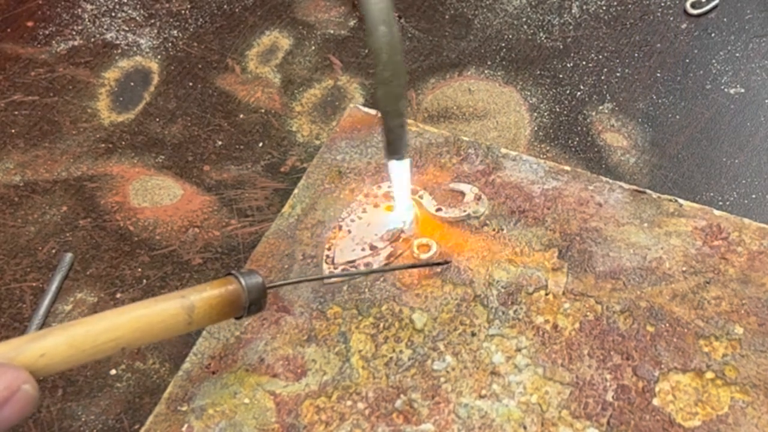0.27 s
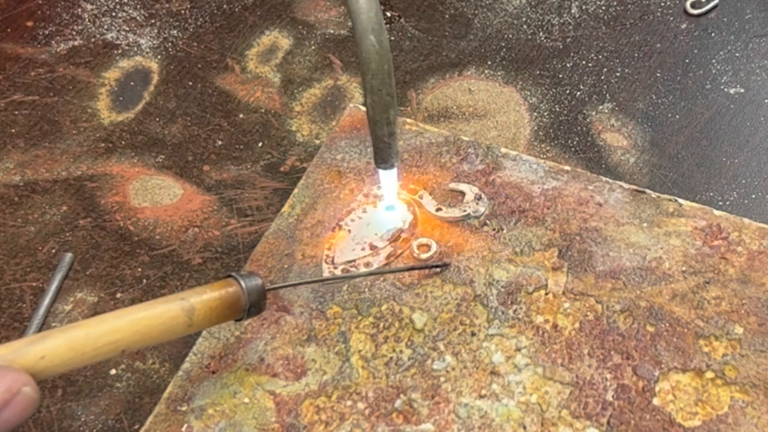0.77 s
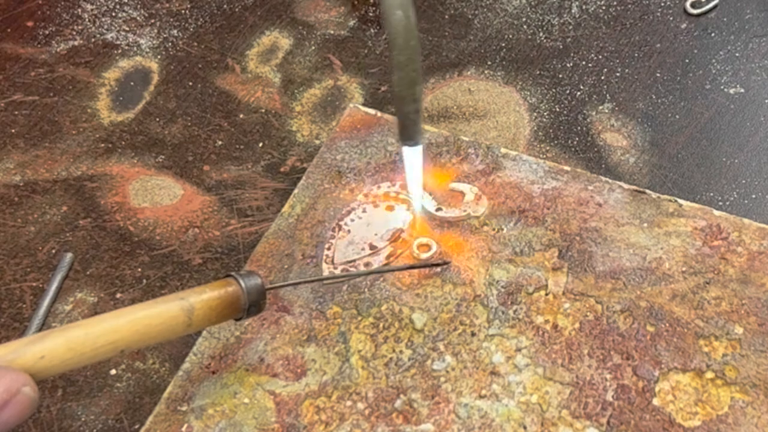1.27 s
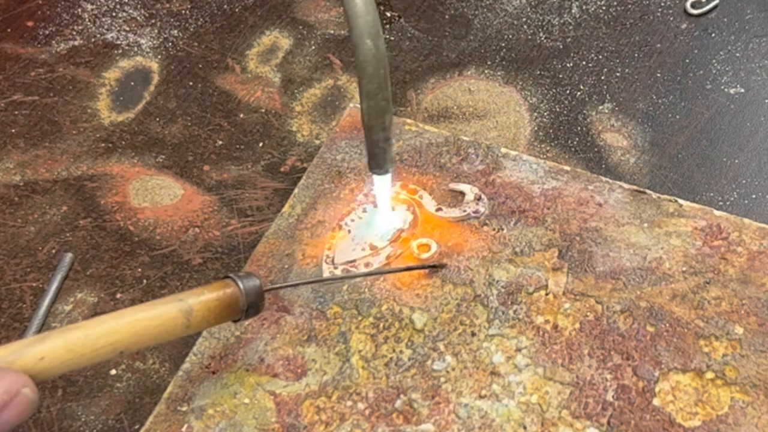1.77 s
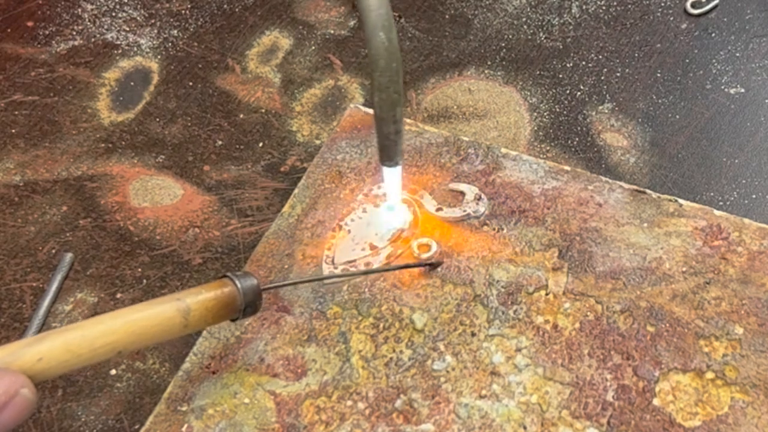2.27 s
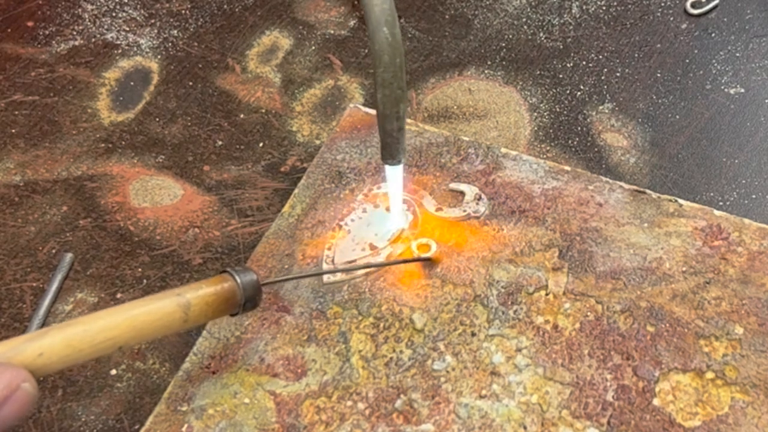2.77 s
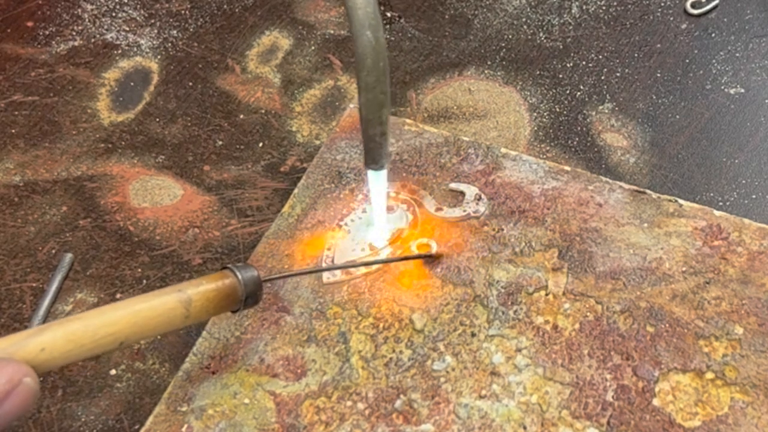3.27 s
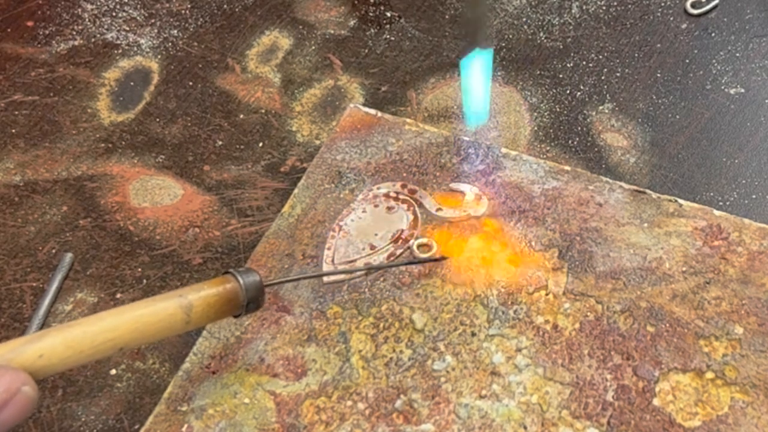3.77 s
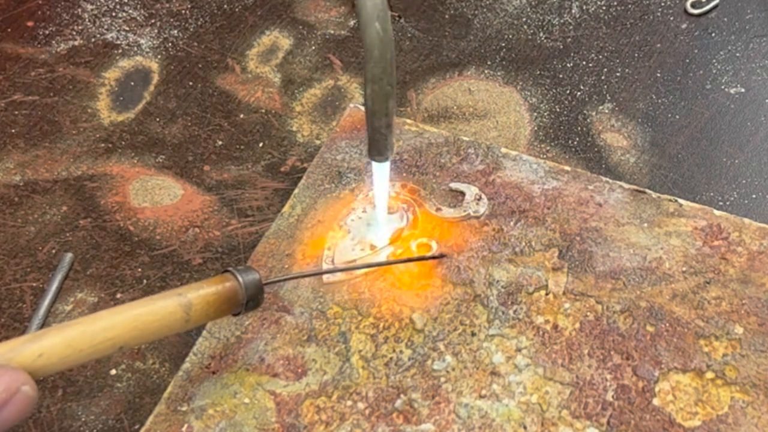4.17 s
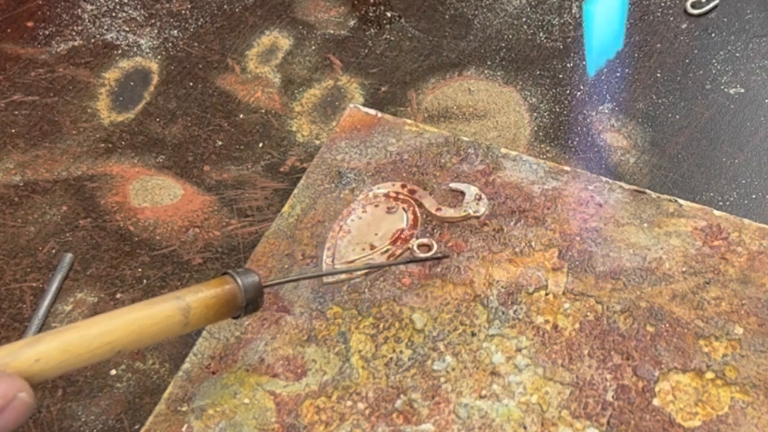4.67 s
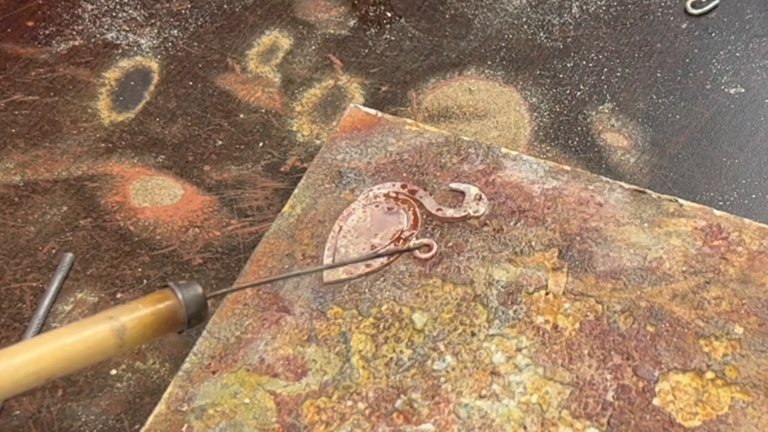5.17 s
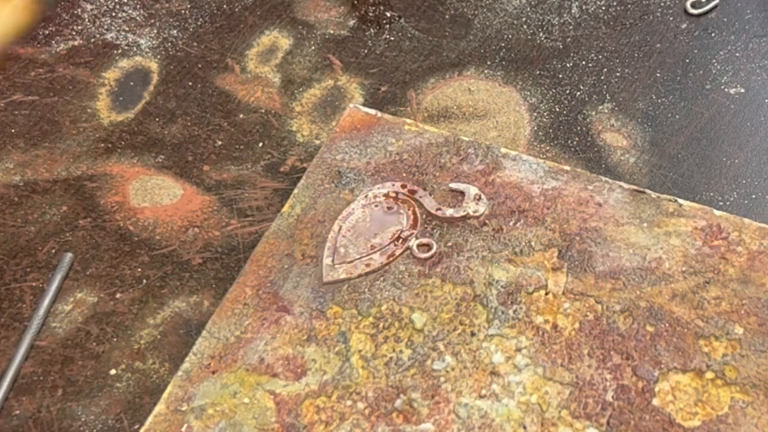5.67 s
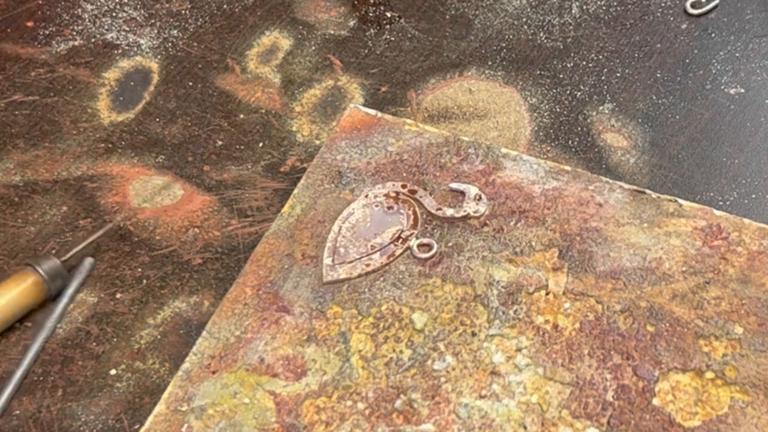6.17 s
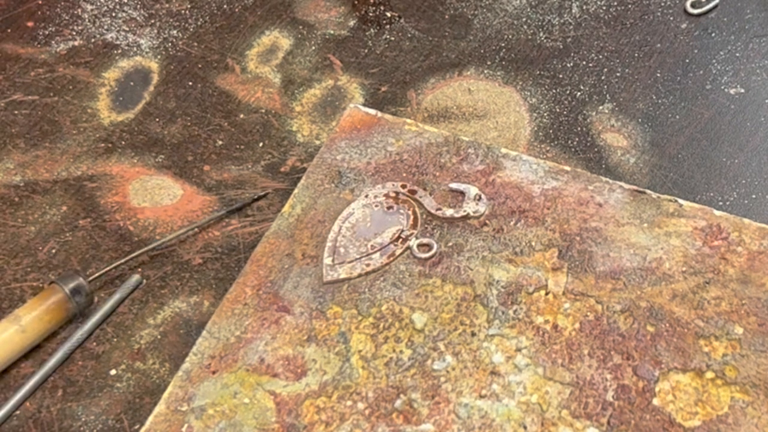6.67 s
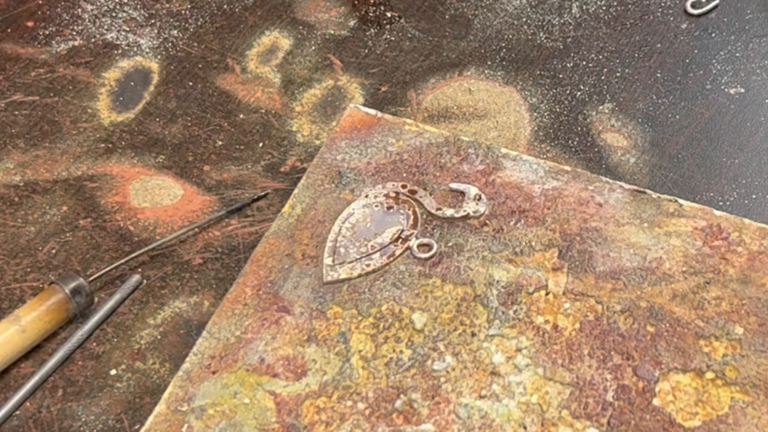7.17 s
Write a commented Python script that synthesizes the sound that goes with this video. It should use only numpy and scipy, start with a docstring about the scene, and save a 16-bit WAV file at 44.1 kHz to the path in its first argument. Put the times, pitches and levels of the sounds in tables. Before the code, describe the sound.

A small gas torch roars, flutters and spits over a hard block, grows quieter, then dies with a sharp gas pop, leaving a faint fan hum.

```python
"""On a workbench in a room with a humming fan, a small gas torch burns over a soldering block.
Turbulent combustion gives a fluttering roar and spitting; the jet hisses through the pipe modes of the neck.
Single spits ring as damped resonances, and the block, bench and room add delayed reflections.
The torch is swung aside, one valve closes with a puff, the flame dies and a last puff of gas escapes."""
import sys
import numpy as np
from scipy import signal
from scipy.fft import rfft, irfft, next_fast_len
from scipy.io import wavfile

SR = 44100
rng = np.random.default_rng(int(sys.argv[2]) if len(sys.argv) > 2 else 0)


def unload_wav(signal):
    """Save mono or channel-first audio to the path in sys.argv[1] as 16-bit WAV at rate SR, clipped to [-1, 1]."""
    wavfile.write(
        sys.argv[1],
        SR,
        np.round(np.clip(np.atleast_2d(signal).T, -1, 1) * 32767).astype(np.int16),
    )


N = 326781
STEP = 16   # samples per step of the slow controls


def from_db(db):
    """Level to amplitude ratio: 20 dB is a factor of ten."""
    return 10 ** (np.asarray(db) / 20)


def rms_one(x):
    """Normalisation of a signal to unit rms."""
    return x / np.sqrt(np.mean(x ** 2) + 1e-20)


def in_time(rows):
    """Linear interpolation of each table column over time, silent outside its span."""
    t, *columns = np.transpose(rows)
    now = np.arange(N) / SR
    return [np.interp(now, t, column, left=-120, right=-120) for column in columns]


def step_to_samples(control):
    """Linear interpolation of a slow control, one value a step, to the sample rate."""
    return np.interp(np.arange(N) / STEP, np.arange(len(control)), control)


def at_hz(points, hz):
    """Spectrum interpolated over log frequency, falling 30 dB per octave beyond its ends."""
    f, level = np.transpose(points)
    octaves_outside = np.abs(np.log2((hz + 1) / np.clip(hz + 1, f[0], f[-1])))
    return np.interp(np.log(hz + 1), np.log(f), level) - 30 * octaves_outside


def coloured(spectrum):
    """Spectral shaping: white noise weighted in the frequency domain, then set to unit rms."""
    size = next_fast_len(N)
    hz = np.arange(size // 2 + 1) * SR / size
    white = rfft(rng.standard_normal(size))
    return rms_one(irfft(white * from_db(at_hz(spectrum, hz)), size)[:N])


def drift(rate_hz):
    """Low-pass random process of unit rms, one value a step."""
    r = np.exp(-2 * np.pi * rate_hz * STEP / SR)
    chance = rng.standard_normal(N // STEP + 3002)
    return rms_one(signal.lfilter([1], [1, -2 * r, r * r], chance)[3000:])   # settled part only


def resonance(x, hz, width_hz):
    """Damped second-order resonator with unit gain at its peak."""
    r = np.exp(-np.pi * width_hz / SR)
    poles = [1, -2 * r * np.cos(2 * np.pi * hz / SR), r * r]
    return signal.lfilter([(1 - r * r) / 2, 0, (r * r - 1) / 2], poles, x)


# Air noise of the fan: f/Hz, relative level/dB
FAN_SPECTRUM = [(13, -72), (22, -41.5), (59, -47), (84, -10), (102, -10), (121, -53), (163, -7.5),
                (215, -8.5), (246, -4), (315, -16), (1020, -18.5), (1460, -29.5), (15500, -61.5)]
# Wavering hums of the fan: f/Hz, width/Hz, level/dB
FAN_HUMS = [(91.6, 26, -61.5), (175.3, 12, -52), (242.5, 8.6, -54)]


def fan():
    """Broadband flow noise plus narrow-band noise, whose small bandwidth is heard as wavering hums."""
    hums = [from_db(db) * rms_one(resonance(rng.standard_normal(N), hz, width_hz))
            for hz, width_hz, db in FAN_HUMS]
    return from_db(-46.5) * coloured(FAN_SPECTRUM) + sum(hums)


def room(x):
    """Reverberation: convolution with a dull, exponentially decaying noise tail."""
    t60_s, level_db = 0.23, -15.5
    t = np.arange(round(.4 * SR)) / SR
    dull = signal.lfilter([1], [1, -1.4, .49], rng.standard_normal(len(t)))
    tail = dull * from_db(-60 * t / t60_s) * (t > .006)   # begins 6 ms after the direct sound
    return from_db(level_db) * signal.fftconvolve(x, tail / np.sqrt(np.sum(tail ** 2)))[:N]


# Deep steady part of the burning: f/Hz, relative level/dB
DRONE_SPECTRUM = [(70, -22.5), (160, 3.5), (260, 0.5), (340, -9.5)]


def drone():
    """Diffuse field: the deep part fills the room evenly until the flame goes out, then fades in 30 ms."""
    flame_out_s = FLAME_LEVEL[-1][0]
    lit = np.clip((flame_out_s - np.arange(N) / SR) / .03 + 1, 0, 1)
    return from_db(-46.5) * lit * coloured(DRONE_SPECTRUM)


# Pitches cancelled by the bench reflection: start t/s, end t/s, start f/Hz, end f/Hz, width/Hz
HOLLOWS = [(0, 4.2, 940, 920, 70), (0, 2.7, 2290, 2290, 130), (0, 5.3, 3600, 3680, 160),
           (4.4, 5.3, 656, 615, 90), (4.6, 5.45, 2860, 2390, 129), (5.75, 6.8, 2040, 1800, 150)]


def hollowed(x, depth):
    """Destructive interference as gliding notches: shift to zero, low-pass, shift back, subtract."""
    out = x.copy()
    for start, end, from_hz, to_hz, width_hz in HOLLOWS:
        a, b = round(start * SR), round(end * SR)
        turn = np.exp(2j * np.pi * np.cumsum(np.linspace(from_hz, to_hz, b - a)) / SR)
        r = np.exp(-np.pi * width_hz / SR)
        at_zero = signal.lfilter([1 - r], [1, -r], out[a:b] / turn)
        band = 2 * np.real(at_zero * turn)
        out[a:b] -= depth * band * signal.windows.tukey(b - a, .1)
    return out


def echoes(x, taps):
    """Superposition of the direct sound and delayed shares, each delay a phase turn in the spectrum."""
    size = next_fast_len(N + 1000)
    turn_per_ms = -2j * np.pi * np.arange(size // 2 + 1) * SR / size / 1000
    reflections = sum(share * np.exp(turn_per_ms * ms) for ms, share in taps)
    return irfft(rfft(x, size) * (1 + reflections), size)[:N]


# Places of the torch: arrival t/s, then its near echoes as (delay/ms, share; negative = inverted)
PLACES = [(0, [(0.435, 0.11), (0.947, 0.098), (1.096, -0.075), (1.26, 0.027), (1.492, 0.19)]),
          (.55, [(0.391, -0.12), (1.161, -0.063), (1.346, -0.031), (1.547, 0.13), (1.63, -0.1),
          (2.467, 0.11), (3.468, -0.12)]), (4.25, [(0.618, 0.091), (1.776, -0.14)]), (4.72, [(0.583, 0.37),
          (1.131, -0.18), (1.791, -0.3), (1.919, -0.11), (2.096, -0.15), (3.255, -0.26)]),
          (5.5, [(0.671, 0.14), (0.778, 0.23), (1.311, -0.088), (1.97, 0.019)])]


def bench(x):
    """Early reflections from block, bench and hands; their comb pattern changes as the torch moves."""
    t, out, left = np.arange(N) / SR, np.zeros(N), np.ones(N)
    for arrival, taps in PLACES[::-1]:
        arrived = np.clip((t - arrival) / 0.18 + 1, 0, 1) * left   # crossfade over the last 0.18 s
        out += arrived * echoes(x, taps)
        left = left - arrived
    return out


# Low burning noise, before a small trim: t/s, level/dB
RUMBLE_LEVEL = [(0.0, -39), (.7, -39), (3.98, -41), (5.3, -46.5), (5.68, -41.5), (6.78, -46.5), (6.82, -61)]
# Its colour: f/Hz, relative level/dB
RUMBLE_SPECTRUM = [(280, -4), (400, -2), (600, 1), (850, 0), (1200, 0.5)]


def rumble():
    """Low combustion noise: steady coloured noise slowly sinks, rises a little, then dies with the flame."""
    level_db, = in_time(RUMBLE_LEVEL)
    return from_db(level_db - 0.26) * coloured(RUMBLE_SPECTRUM)


# Narrow bands that stand out: start t/s, end t/s, start f/Hz, end f/Hz, width/Hz, level/dB before fades
WHISTLES = [(0.502, 0.72, 650, 710, 330, -36.5), (.04, 0.34, 4650, 4500, 340, -41.5),
            (3.135, 3.351, 2870, 2950, 230, -44.5), (4.56, 5.7, 3214, 2850, 300, -46.5),
            (4.86, 5.302, 5300, 4900, 300, -59), (5.05, 5.4, 6900, 6100, 230, -53),
            (5.1, 6.07, 1150, 1000, 190, -42), (6.002, 6.789, 1030, 950, 200, -44.5),
            (5.9, 6.79, 1500, 1450, 240, -41), (5.75, 6.795, 2520, 2300, 210, -47.5),
            (5.75, 6.3, 3050, 3150, 220, -50.5), (5.9, 6.35, 5100, 5100, 220, -57),
            (6.2, 6.79, 3850, 3750, 230, -58), (4.25, 4.9, 5300, 5000, 300, -54.5)]


def whistles():
    """Narrow-band noise by quadrature modulation of a gliding carrier, swelling in and out."""
    out = np.zeros(N)
    for start, end, from_hz, to_hz, width_hz, db in WHISTLES:
        a, b = round(start * SR), round(end * SR)
        r = np.exp(-np.pi * width_hz / SR)
        slow = signal.lfilter([1], [1, -2 * r, r * r], rng.standard_normal((2, b - a)))
        phase = 2 * np.pi * np.cumsum(np.linspace(from_hz, to_hz, b - a)) / SR
        band = rms_one(slow[0] * np.cos(phase) + slow[1] * np.sin(phase))
        out[a:b] += from_db(db) * band * signal.windows.tukey(b - a, .4)
    beads = from_db(3.0 * drift(60))   # one common flutter chops them into beads
    return out * step_to_samples(beads)


# Puffs of gas at the valves: start t/s, level/dB, rise time constant/s, shut t/s, fall/(dB per s)
PUFFS = [(5.614, -22, 0.016, 5.672, 700), (6.853, -21, 0.0082, 6.915, 700)]
# Colour of each puff: f/Hz, relative level/dB
PUFF_SPECTRA = [
    [(180, -62), (300, -27), (592, -21), (653, -22), (1000, -4), (1250, -7), (1330, -7.5), (3540, -14),
     (5720, -14.5), (15700, -29.5)],
    [(59, -51), (100, -9), (156, -3.5), (543, -23.5), (591, -11.5), (1440, -4), (1560, -5.5), (2600, -10),
     (6320, -28), (7330, -22.5), (15700, -48)],
]
# Modes of the valve click: f/Hz, level/dB, T60/s
CLICK_MODES = [(1570, -10.5, 0.018), (4570, -23, .01)]


def valves():
    """Escaping-gas noise swells until the gap shuts, then decays; damped modes click at the second puff."""
    now, out = np.arange(N) / SR, 0
    for (start, db, rise_s, shut, fall), spectrum in zip(PUFFS, PUFF_SPECTRA):
        opening = (1 - np.exp(-np.maximum(now - start, 0) / rise_s)) ** 2
        level_db = db - fall * np.maximum(now - shut, 0)
        out = out + opening * from_db(level_db) * coloured(spectrum)
    t = np.maximum(now - 6.8543, 0)   # time since the click
    swell = 1 - np.exp(-t / 0.00089)
    for hz, db, t60 in CLICK_MODES:
        out = out + from_db(db - 60 * t / t60) * swell * np.sin(2 * np.pi * hz * t)
    return out


# Pitches favoured by spits while the flame is over the block: f/Hz
BLOCK_RINGS = [1310, 1650, 1950, 2520, 3280, 4020, 4550, 5500, 6400, 7200, 9200, 10200, 11700, 12700]


def favoured(hz, s):
    """Mode selection: over the block a chance pitch moves to the nearest favoured one."""
    swung_aside_s = 4.2
    if s >= swung_aside_s:
        return hz
    return min(BLOCK_RINGS, key=lambda ring: abs(np.log(ring / hz)))


# Spells of small spits: start t/s, end t/s, rate/(1 per s), middle peak level/dB, low f/Hz, high f/Hz
SPUTTER = [(0, .36, 60, -34.5, 4000, 13000), (.36, 1.1, 20, -35.5, 2300, 8000),
           (1.1, 1.5, 90, -28.5, 2300, 4350), (1.68, 1.86, 80, -34.5, 3550, 8080),
           (2.33, 2.901, 60, -33.5, 2300, 5540), (3.15, 3.35, 40, -42.5, 6000, 14000),
           (3.35, 4.2, 20, -37, 2290, 8000), (4.2, 4.56, 35, -37.5, 3050, 9200),
           (4.6, 5.45, 25, -30.5, 2850, 3250), (4.6, 5.412, 45, -38.5, 4900, 7800),
           (5.45, 5.57, 90, -31.5, 5450, 10700)]


def sputter():
    """Bernoulli point process: small spits at chance moments and pitches, as rows like the loud ones."""
    slot_s, spread_db = .002, 0.5   # peaks scatter evenly by plus or minus the spread
    when = np.arange(0, N / SR, slot_s)
    draws = rng.random((len(SPUTTER), len(when), 3))
    rows = []
    for (start, end, per_s, db, low_hz, high_hz), spell in zip(SPUTTER, draws):
        for s, (chance, size, pitch) in zip(when, spell):
            if start <= s < end and chance < per_s * slot_s:
                hz = low_hz * (high_hz / low_hz) ** pitch
                rows.append((s, db + spread_db * 2 * (size - .5), favoured(hz, s)))
    return rows


# Loud single spits: t/s, peak level/dB of the main ring before the common gain, f/Hz
LOUD_SPITS = [(0.0408, -32, 7150), (0.0705, -27, 4240), (0.0733, -32, 9150), (0.126, -22.5, 6160),
              (0.127, -12.5, 1310), (0.135, -19, 1280), (0.1371, -36, 12400), (0.1598, -33, 9700),
              (0.2335, -9.5, 1610), (0.236, -24, 5520), (0.2725, -11, 1884), (0.3028, -8, 1830),
              (0.3238, -24.5, 4600), (0.4668, -23, 3300), (0.6605, -19, 2450), (0.6856, -23.5, 2700),
              (0.9674, -16.5, 3270), (1.0342, -18, 2020), (1.0487, -9, 1670), (1.0674, -13, 1830),
              (1.078, -9, 1880), (1.142, -23.5, 4020), (1.1837, -12.5, 1630), (1.2004, -16.5, 2420),
              (1.3281, -16, 2150), (1.3418, -15.5, 2520), (1.3687, -15.5, 3340), (1.3863, -11.5, 1780),
              (1.4853, -16.5, 2620), (1.7106, -13, 2140), (1.7132, -20.5, 3970), (1.733, -29, 7300),
              (1.8346, -29, 5470), (1.8931, -18, 2460), (2.0, -14.5, 1610), (2.0202, -15, 1690),
              (2.3751, -24, 3260), (2.4035, -17, 2500), (2.4054, -19.5, 4130), (2.4845, -19.5, 3740),
              (2.6059, -21.5, 2465), (2.7065, -19, 2860), (2.7168, -17.5, 1980), (2.8275, -22.5, 3900),
              (2.849, -22, 3270), (3.838, -19, 3410), (4.0144, -11.5, 1570), (4.0286, -11, 1740),
              (4.0814, -19, 1220), (4.15, -23, 3420), (4.2552, -25.5, 6260), (4.2955, -28, 7100),
              (4.3931, -26, 3740), (4.4287, -28.5, 5250), (4.8684, -22, 5130), (4.9302, -23, 3160),
              (4.9816, -28, 3100), (5.237, -22, 3020), (5.2726, -29, 6130), (5.403, -23, 2850),
              (5.4276, -26, 2880), (5.4705, -26, 5940), (5.4866, -23.5, 6120), (5.52, -26, 9200),
              (5.5805, -30, 10600), (5.6709, -27, 10600), (5.8737, -27, 5680), (5.9154, -35, 9000),
              (6.1875, -24.5, 1490), (6.279, -24.5, 1000)]


def spits(swell_s, fade_s, width_hz, rise, gain_db, crack_db):
    """Impulsive excitation of resonators: a decaying noise rings at two pitches, each with a broad crack."""
    length, second_ring_db = 1500, -12
    out, t = np.zeros(N + length), np.arange(length) / SR
    gas, octaves = rng.standard_normal(N + length), rng.uniform(-1, 1, N)
    envelope = np.exp(-t / fade_s) * (1 - np.exp(-t / swell_s))
    for s, db, hz in LOUD_SPITS + sputter():
        at = round(s * SR)
        puff = gas[at:at + length] * envelope
        second_hz = favoured(np.clip(hz * 2 ** octaves[at], 1100, 14000), s)
        for level_db, ring_hz in (db, hz), (db + second_ring_db, second_hz):
            width = width_hz * (ring_hz / 3000) ** rise   # higher rings are wider
            ring = resonance(resonance(puff, ring_hz, width), ring_hz, 2 * width)
            crack = resonance(resonance(puff, ring_hz, ring_hz / 2), ring_hz, ring_hz)
            sound = ring / np.max(np.abs(ring)) + from_db(crack_db) * crack / np.max(np.abs(crack))
            out[at:at + length] += from_db(level_db + gain_db) * sound
    return out[:N]


# How unsteadily the flame burns: t/s, factor on its flutter
UNREST = [(0, 0.97), (.6, 0.95), (4.2, 1.07), (5.55, 1.5), (5.75, 1.12), (7.41, 0.86)]


def turbulent(spectrum, together, flutter_db, own_db, per_s, kick_db, fade_s, reach):
    """Intermittent turbulence: noise bands flutter; eddies burst into neighbouring bands and fade."""
    noise, steps, bands = coloured(spectrum), N // STEP + 2, 18
    unrest = np.interp(np.arange(steps) * STEP / SR, *np.transpose(UNREST))
    edges = np.geomspace(spectrum[0][0], spectrum[-1][0], num=bands + 1)
    kick = from_db(kick_db * np.minimum(rng.exponential(1, steps), 2.5))
    born = (rng.random(steps) < per_s * STEP / SR) * kick
    centre, fade = rng.uniform(0, bands, steps), np.exp(-STEP / SR / fade_s)
    out = np.zeros(N)
    for k in range(bands):
        eddies = signal.lfilter([1], [1, -fade], born * np.exp(-((k - centre) / reach) ** 2))
        flutter = from_db(unrest * (flutter_db * together + own_db * drift(21)))
        gain = flutter * (1 + unrest * eddies)
        band_filter = signal.butter(2, edges[k:k + 2], "band", fs=SR, output="sos")
        band = signal.sosfilt(band_filter, noise)
        out += band * step_to_samples(gain) * (-1) ** k   # alternate signs: neighbours add at their edge
    return rms_one(out)


def neck(jet, waver_db):
    """Pipe resonance: harmonic modes of the torch neck pick bands out of the jet, each swelling alone."""
    spacing_hz, width_hz, share = 1063, 200, 1.1
    picked = np.zeros(N)
    for k in range(4, 15):
        swell = from_db(waver_db * step_to_samples(drift(1.9)))
        picked += swell * resonance(jet, k * spacing_hz, width_hz)
    return rms_one(jet + share * picked)


# Roar until the flame goes out, before a trim: t/s, level/dB
FLAME_LEVEL = [(0.0, -27), (0.31, -18.5), (0.51, -31), (0.69, -29), (0.9, -35), (1.07, -23), (1.12, -27.5),
               (1.29, -26), (1.39, -23), (1.45, -28.5), (1.7, -30), (1.76, -20.5), (1.89, -29.5),
               (2.01, -25), (2.11, -36), (2.42, -34.5), (2.55, -38), (2.66, -29.5), (2.85, -35),
               (3.1, -38.5), (3.82, -34.5), (4.04, -26), (4.12, -35), (4.43, -41.5), (5.55, -39),
               (5.73, -40), (5.77, -34), (5.85, -37), (6.314, -34), (6.748, -47.5), (6.778, -35),
               (6.805, -66)]
# Jet hiss, before a trim: t/s, level/dB
JET_LEVEL = [(0, -41), (.33, -42), (.5, -42), (1.8, -42.5), (3.1, -45), (4.15, -42), (5.16, -47.5),
             (5.54, -40.5), (5.61, -44), (5.85, -44), (6.78, -46.5), (6.805, -63)]
# Colours of roar, spitting and hiss: f/Hz, relative level/dB
ROAR_SPECTRUM = [(500, -7), (900, -15.5), (1200, 1.5), (1600, 8), (2100, 1.5), (2600, -50.5), (4000, -76)]
SPIT_SPECTRUM = [(1500, 0.5), (2300, 19), (3000, 13.5), (4000, 7), (5000, -13), (7000, -32), (12000, -8.5)]
HISS_SPECTRUM = [(3000, 7), (5000, 0), (6500, 0), (8000, -2.5), (10000, -10.5), (12500, -17.5),
                 (17000, -21)]


def flame():
    """Turbulent combustion and jet noise: one flutter shakes roar, spitting and the hiss of the neck."""
    roar_db, = in_time(FLAME_LEVEL)
    jet_db, = in_time(JET_LEVEL)
    # spitting follows 0.54 of the roar's swing, at most 20 dB above the roar
    spit_db = np.minimum(-37 + 0.54 * (roar_db + 30), roar_db + 20)
    spit_db = spit_db - 2.5 * (np.arange(N) / SR > PUFFS[0][0])   # drop from the first valve puff on
    shake = drift(9.9) + 1.71 * drift(147)
    roar = turbulent(ROAR_SPECTRUM, shake, flutter_db=1.49, own_db=1.25, per_s=36, kick_db=5.0,
                     fade_s=0.0021, reach=4.2)
    spit = turbulent(SPIT_SPECTRUM, shake, flutter_db=2.0, own_db=1.4, per_s=140, kick_db=3.8,
                     fade_s=.004, reach=1.2)
    jet = turbulent(HISS_SPECTRUM, shake, flutter_db=1.4, own_db=1.3, per_s=70, kick_db=4.0,
                    fade_s=.004, reach=2.0)
    hiss = neck(jet, waver_db=3.0)
    return from_db(roar_db - 1.5) * roar + from_db(spit_db) * spit + from_db(jet_db - 2.5) * hiss


def scene():
    """Superposition: the torch with its reflections and room tail over the drone and the fan."""
    single = spits(swell_s=0.0014, fade_s=0.0042, width_hz=258, rise=0.64, gain_db=-1.0, crack_db=-13)
    torch = bench(flame() + rumble()) + single + whistles() + valves()
    return (hollowed(torch + room(torch), depth=0.73) + drone() + fan())[None]


def record(dry):
    """Band limitation: a steep elliptic low-pass cuts the top above 15.7 kHz."""
    return signal.sosfilt(signal.ellip(14, .5, 80, 15700, fs=SR, output="sos"), dry)


dry = scene()
out = record(dry)
unload_wav(out)
```